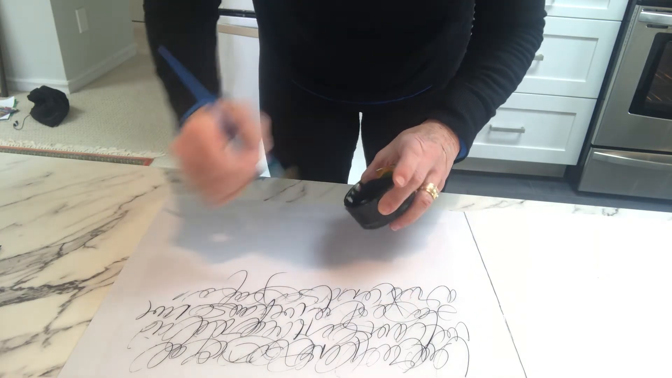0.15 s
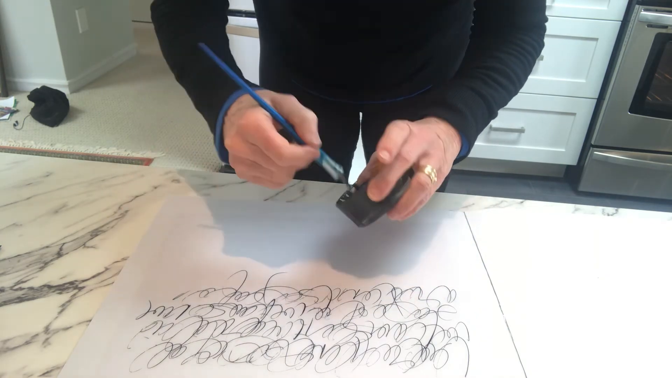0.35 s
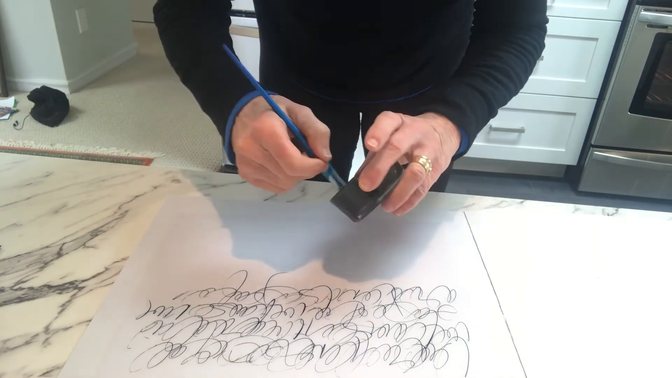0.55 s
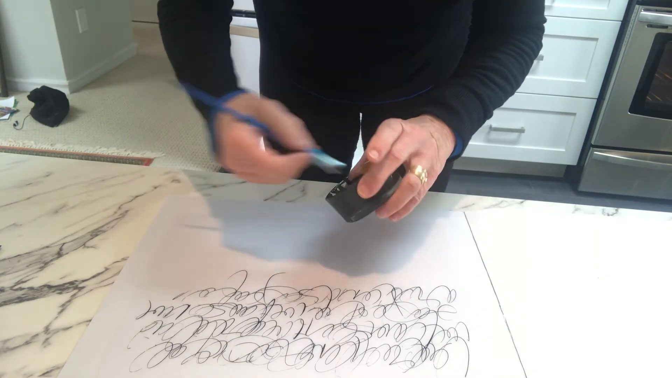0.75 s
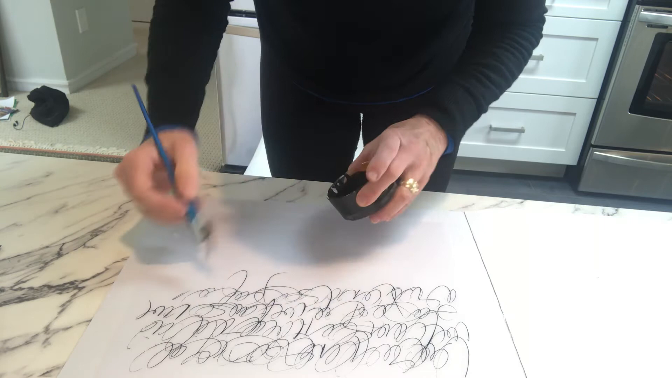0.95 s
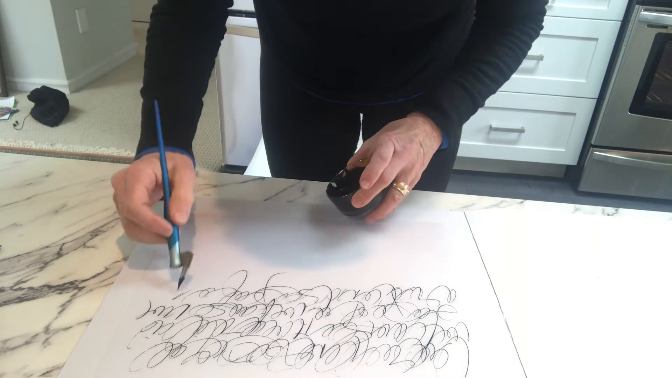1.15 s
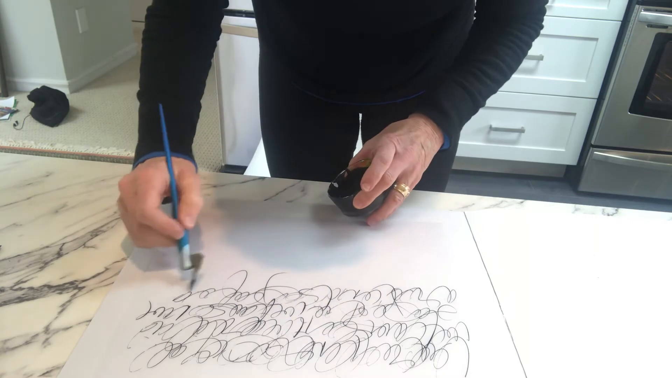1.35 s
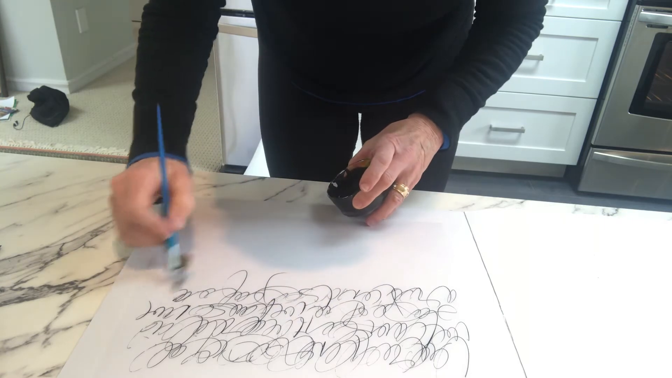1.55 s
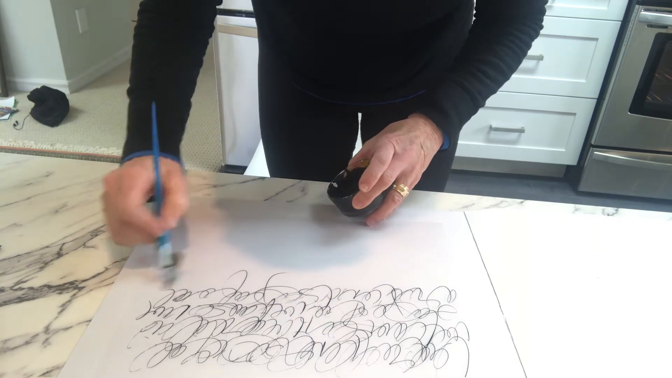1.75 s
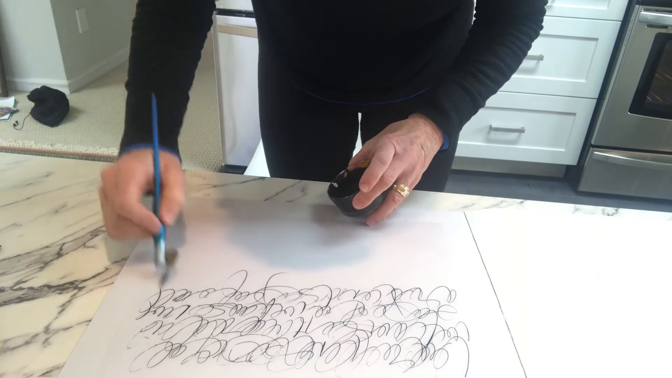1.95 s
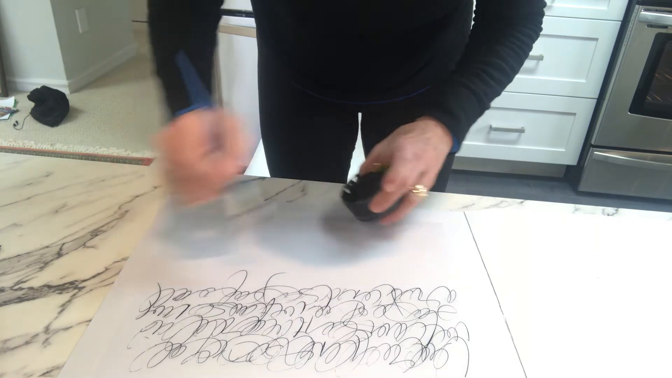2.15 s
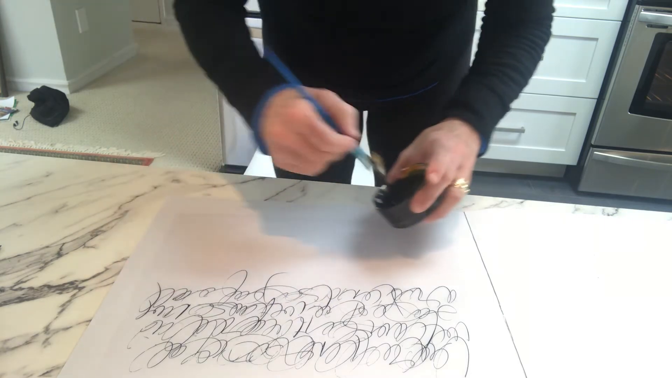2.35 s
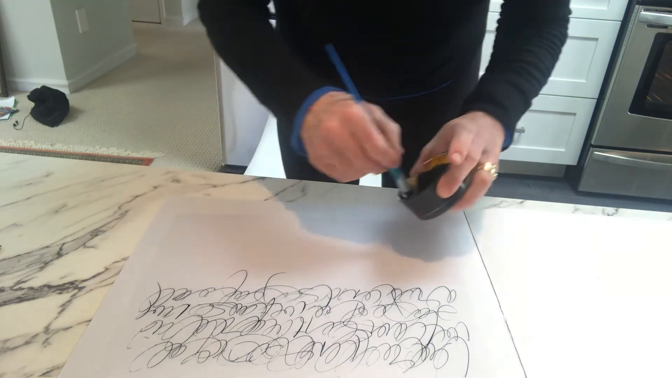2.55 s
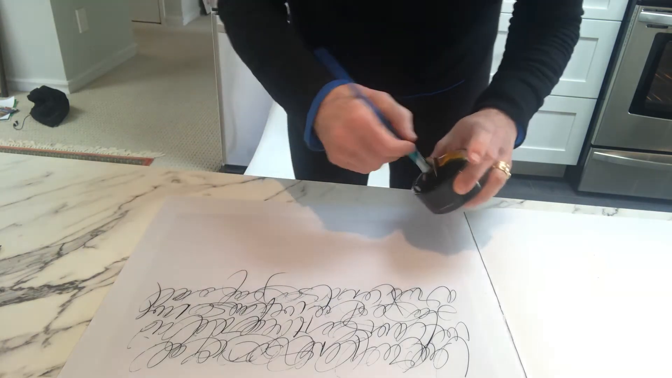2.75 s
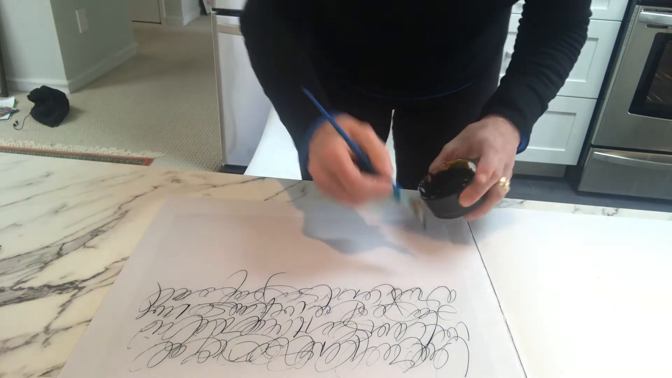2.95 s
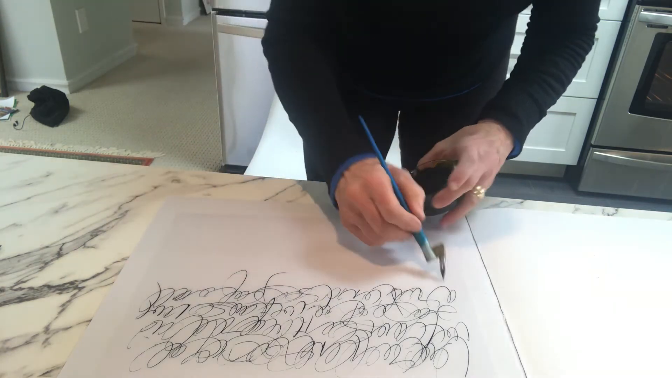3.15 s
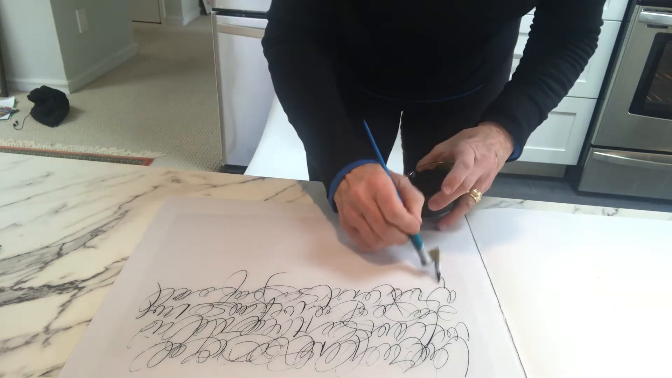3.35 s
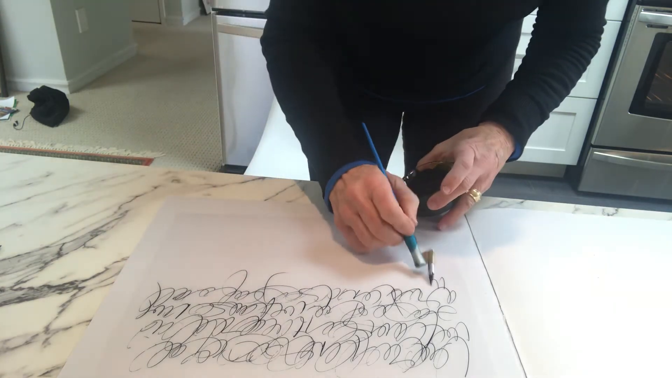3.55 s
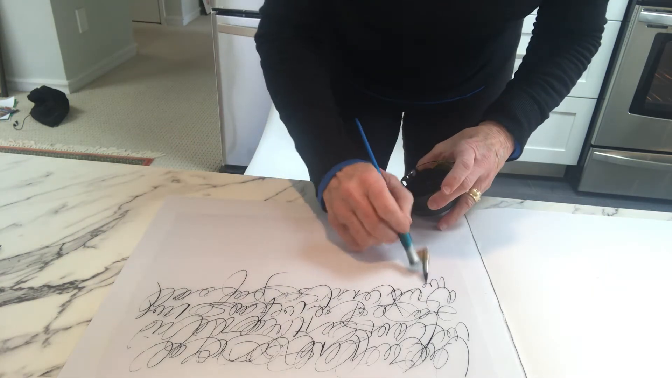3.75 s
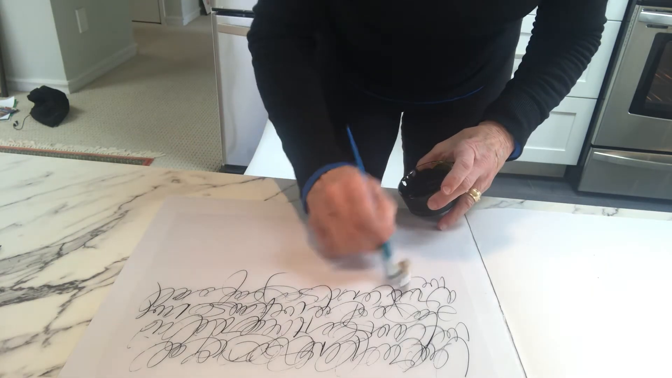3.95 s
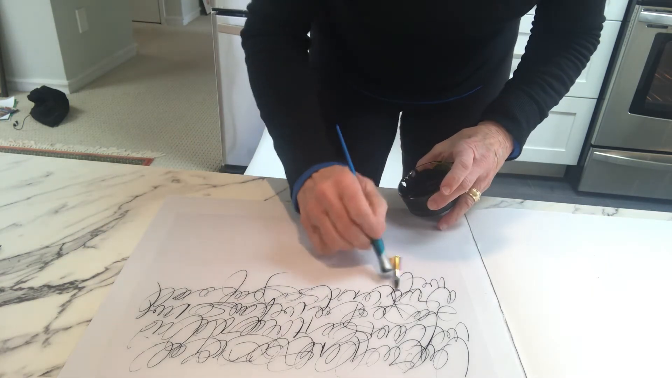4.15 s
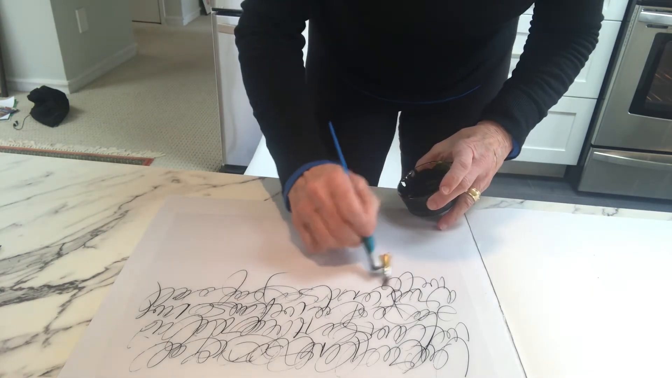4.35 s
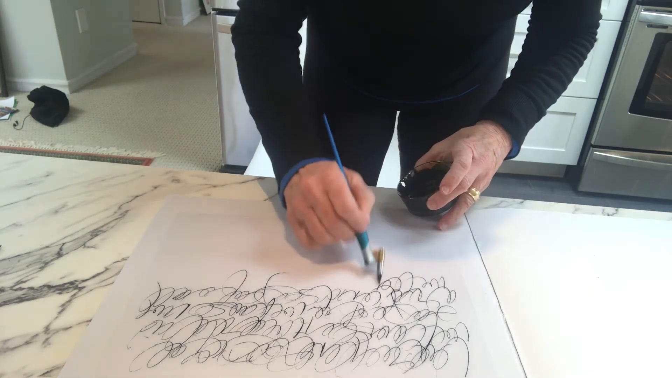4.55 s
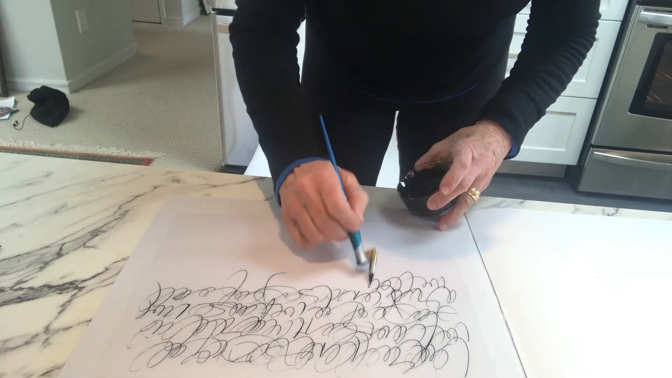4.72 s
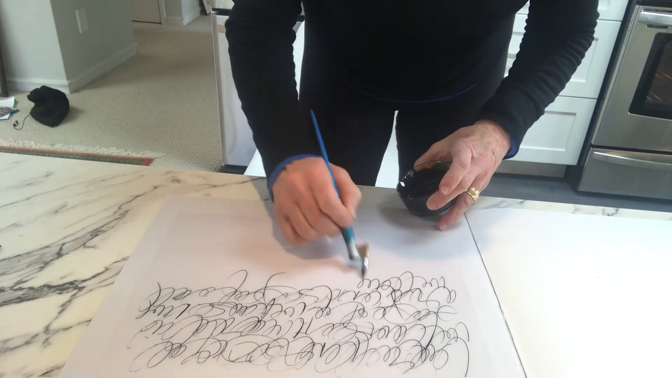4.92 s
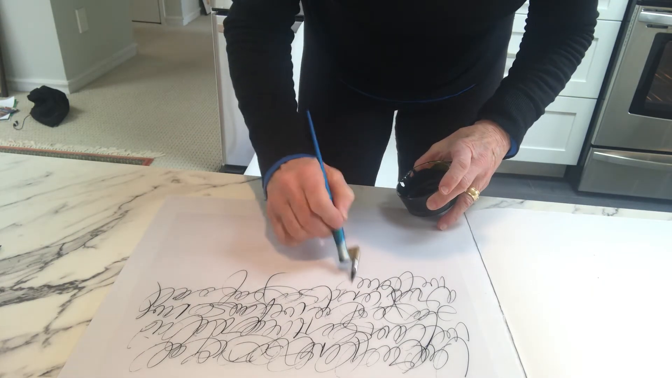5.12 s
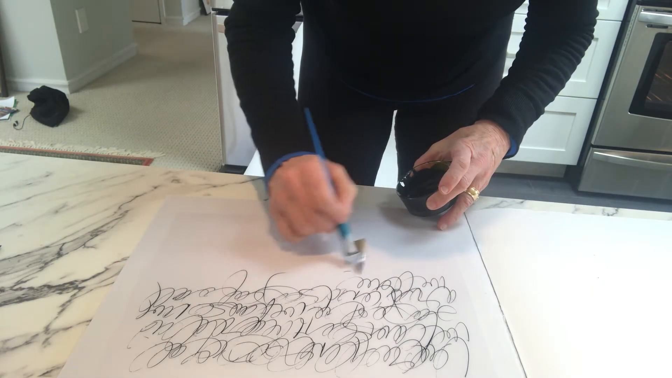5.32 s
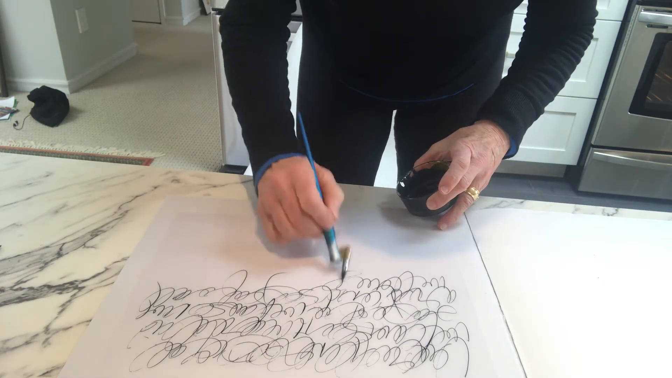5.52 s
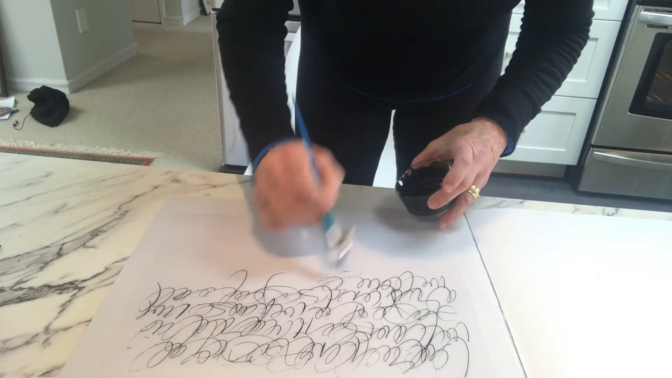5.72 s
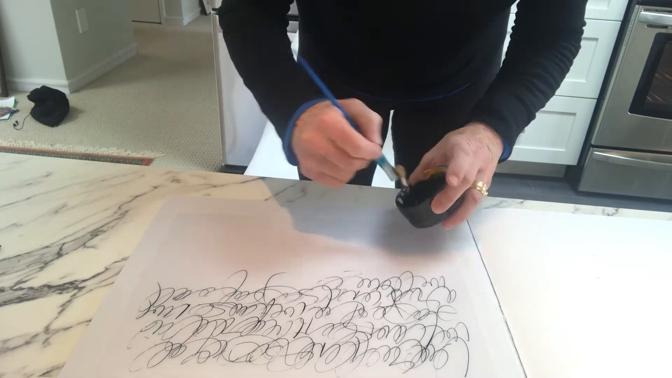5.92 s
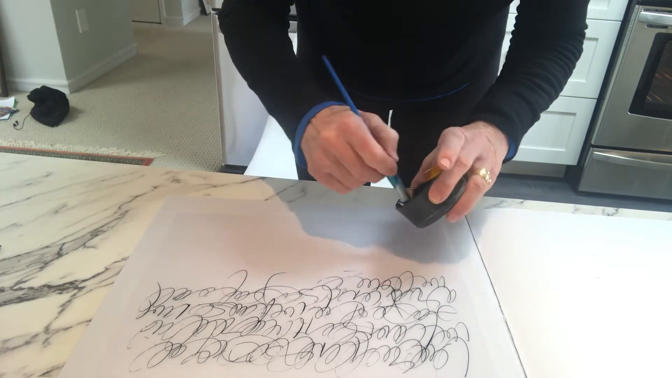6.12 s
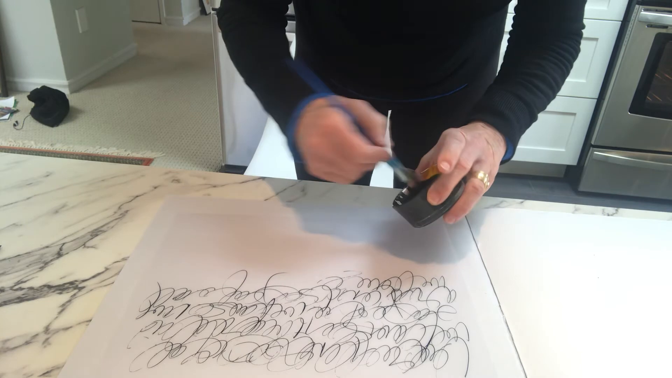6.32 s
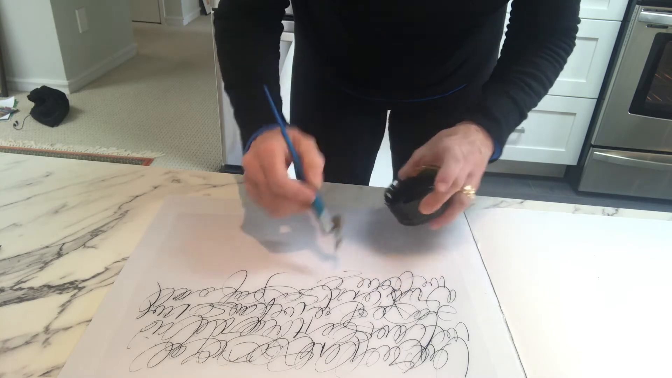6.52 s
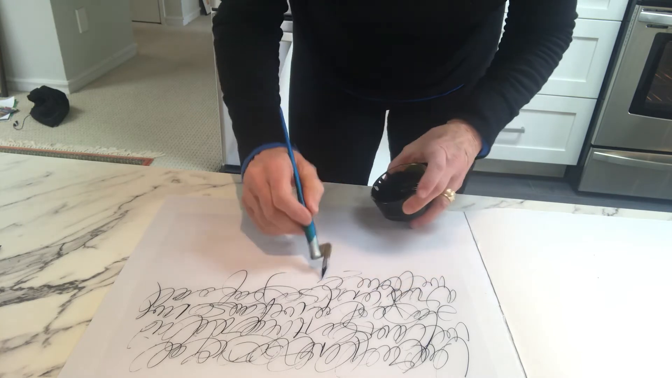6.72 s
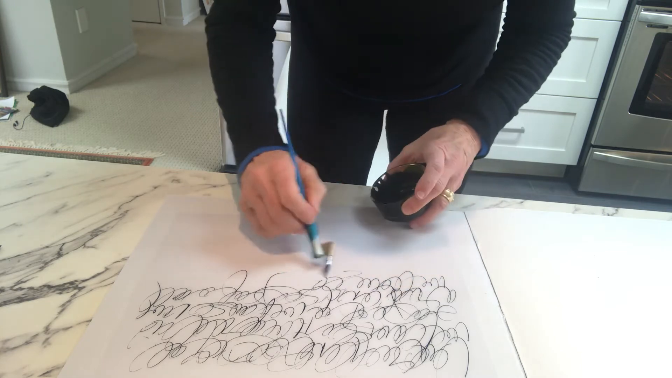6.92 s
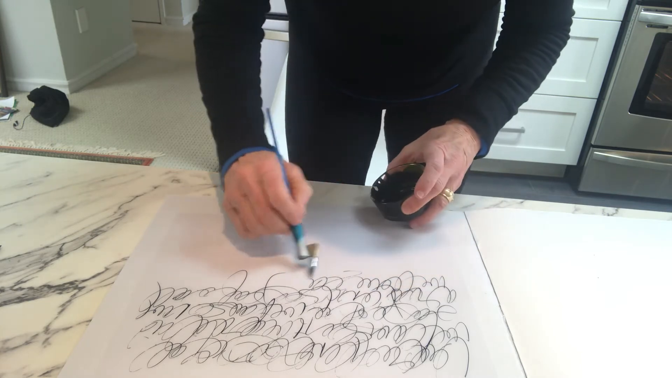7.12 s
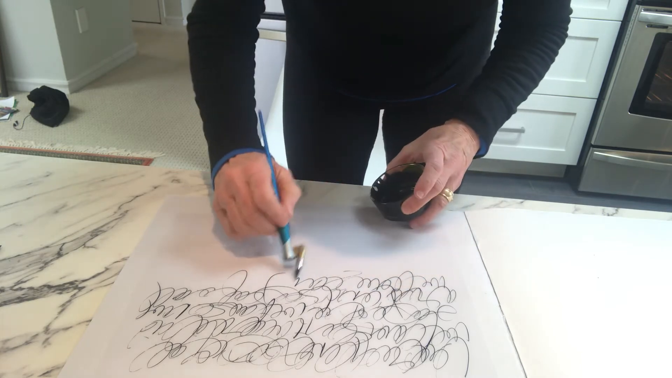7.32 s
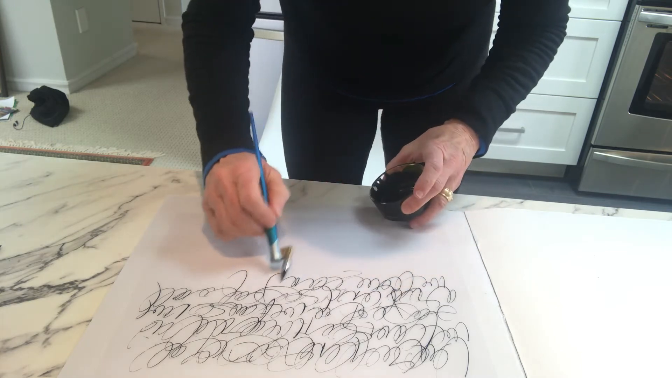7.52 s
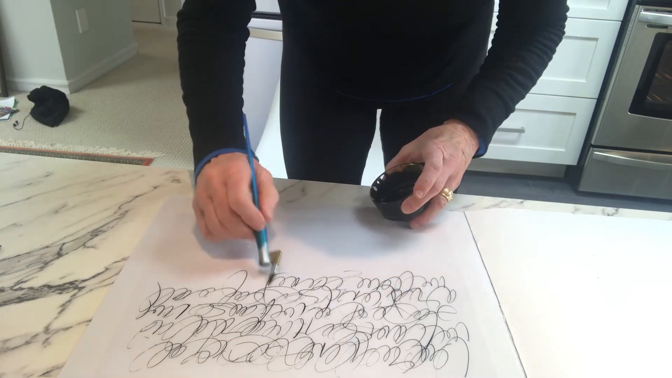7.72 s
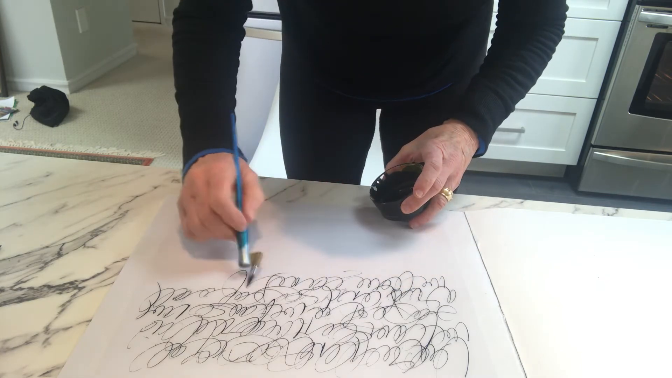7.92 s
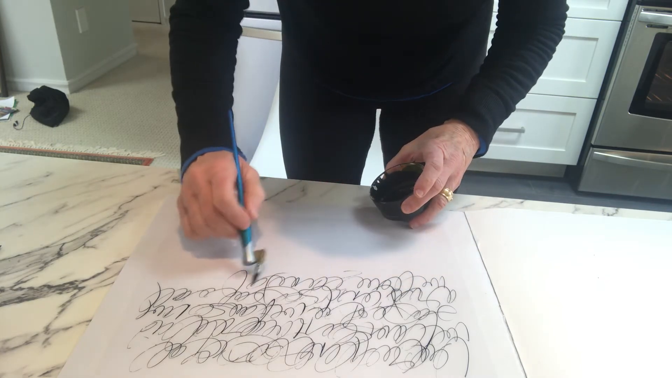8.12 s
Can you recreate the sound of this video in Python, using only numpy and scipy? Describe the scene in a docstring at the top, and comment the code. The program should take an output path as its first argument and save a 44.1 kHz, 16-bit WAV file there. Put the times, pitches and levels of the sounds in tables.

```python
"""A quiet kitchen: a steel dip pen writes three runs of script on a sheet of paper on a stone counter.
The nib snags on paper fibres: noise clicks ring the sheet near 1.3 kHz, and the steel rasps and fizzes above.
Before and between runs the pen clinks in a glass inkwell, as decaying sines and grit; once a sleeve brushes past.
One microphone hears it all close up, with faint reflections, shaped room air and a low hum behind."""
import sys
import numpy as np
from scipy import signal
from scipy.fft import rfft, irfft
from scipy.io import wavfile
from scipy.ndimage import uniform_filter1d, map_coordinates

SR = 44100
rng = np.random.default_rng(int(sys.argv[2]) if len(sys.argv) > 2 else 0)


def wrap_up_sound(samples):
    """Save the sound to the file named by the first command line argument, as 16-bit audio."""
    columns = np.atleast_2d(samples).T
    # keep every value between -1 and 1, then stretch to whole-number steps
    tamed = np.clip(columns, -1, 1)
    steps = np.round(tamed * 32767).astype(np.int16)
    wavfile.write(sys.argv[1], SR, steps)


N = 364707
TIME = np.arange(N) / SR

# Colour of the kitchen air. Each row: frequency in Hz, relative density in dB per Hz.
AIR_COLOUR = [(15, -54), (25, -39), (59, 0.5), (96, -7), (157, -6), (382, -9), (414, -10.5), (500, -12.5),
              (1150, -17), (1590, -20.5), (15800, -38)]
# Hum of an appliance. Each row: frequency in Hz, rms level in dB.
APPLIANCE_HUM = [(69.5, -85.5), (414.5, -79.5)]
# Decay of the kitchen's reflections. Each row: frequency in Hz, time to fall 60 dB in seconds.
ROOM_DECAY = [(1300, 0.47), (5000, 0.35), (15000, 0.28)]

# The sleeve brushing past. Each row: time in seconds, level in dB.
SLEEVE_LEVEL = [(2.1, -85), (2.19, -64.5), (2.275, -57.5), (2.33, -66), (2.44, -81)]
# Colour of the cloth. Each row: frequency in Hz, relative density in dB per Hz.
CLOTH_COLOUR = [(400, -9), (900, -2), (1750, 0), (6500, -5), (11000, -13.5), (16000, -17)]

# The pen knocks against the inkwell. Each row: start in seconds, contact time in seconds, scrape level in dB,
# glass level in dB before the common lift, pen ping in Hz.
INKWELL_KNOCKS = [(0.5065, .004, -60.5, -60, 1400), (2.504, 0.0047, -56, -54, 2720),
                  (2.5345, 0.0072, -50, -29, 2970), (2.625, 0.00081, -48, -44, 1510),
                  (6.1751, 0.0075, -53.5, -52, 2515), (6.202, 0.0032, -44, -33, 4030),
                  (6.212, 0.0042, -48, -41, 4580)]
# The nib is wiped lightly on the rim. Each row: start in seconds, contact time in seconds, scrape level in dB.
RIM_WIPES = [(0.502, .003, -60), (0.572, 0.021, -60), (0.603, 0.0031, -55), (6.107, .003, -59.5),
             (6.241, 0.0073, -60)]
# Modes of the glass. Each row: frequency in Hz, relative level in dB, time to fall 60 dB in seconds.
GLASS_MODES = [(3526, -0.5, 0.064), (3560, -32, 0.14), (3640, -14, 0.029), (4350, -24, 0.04),
               (6050, -7, 0.021), (7520, -22, 0.053)]
# Colour of the pen scraping on the rim. Each row: frequency in Hz, relative density in dB per Hz.
SCRAPE_COLOUR = [(400, -5), (950, 2), (1900, 1.5), (5000, 0), (7000, 7), (9000, 2.5), (11000, 1),
                 (16000, 0.5)]
# Colour of the well's hollow. Each row: frequency in Hz, relative density in dB per Hz.
HOLLOW_COLOUR = [(450, -16), (900, 4), (1500, -1), (2200, -3), (3200, -28)]

# Resonances of the steel nib. Each row: frequency in Hz, width in Hz, lift in dB.
NIB_RESONANCES = [(3090, 230, 5.5), (4450, 67, 9.5), (5500, 200, 3.5), (6110, 350, 7), (6970, 98, 6.5),
                  (10310, 220, 6.5), (12060, 520, 10.5)]
# What lying flat adds to the nib's colour. Each row: frequency in Hz, width in Hz, lift in dB.
FLAT_NIB_CHANGES = [(2150, 700, -5), (3900, 800, 7), (12200, 700, -4)]
# How flat the nib lies on the paper. Each row: time in seconds, share from 0 to 1.
NIB_FLATNESS = [(1.1, 1), (2.0, 1), (3.25, .75), (3.92, .9), (4.3, 0)]
# The nib ticks as it touches down on the paper at the start of a run. Each row: start in seconds,
# level in dB before colouring.
NIB_TICKS = [(1.164, -51), (3.197, -56), (3.231, -50.5), (6.732, -54)]
# The nib's edge whistles briefly. Each row: start in seconds, length in seconds, first pitch in Hz,
# last pitch in Hz, rms level at its height in dB.
EDGE_WHISTLES = [(1.158, 0.036, 5000, 5070, -59.5), (1.518, 0.066, 8250, 6430, -54),
                 (1.728, 0.066, 7500, 4854, -58), (1.843, 0.087, 3917, 4800, -56),
                 (3.829, 0.12, 3950, 3603, -57.5)]
# The nib catches hard and lets go. Each row: start in seconds, peak level in dB.
HARD_CATCHES = [(1.2112, -42), (1.3562, -33), (3.2303, -44), (3.319, -38), (3.3765, -35), (3.5023, -32),
                (3.6452, -32.5), (3.818, -29), (4.0636, -28.5), (4.2428, -39), (4.793, -33.5),
                (5.4466, -35)]

# Pen strokes; the first row is the fading echo of a stroke made before the scene begins. Each row: start in
# seconds, length in seconds, sheet level in dB and brightness (fizz over the sheet) in dB, both before trims.
PEN_STROKES = [(0.0, 0.1, -64.5, -12.0), (1.164, 0.049, -57.5, -5.5), (1.196, 0.13, -47, -8.5),
               (1.311, 0.082, -40, -14.0), (1.399, 0.098, -47.5, -9.5), (1.474, 0.14, -41.5, -8.5),
               (1.604, 0.11, -48.0, -5.5), (1.669, 0.1797, -44.5, -7.0), (1.821, 0.152, -50.5, 0.0),
               (3.184, 0.039, -57.5, -14), (3.222, 0.084, -44.5, -11), (3.308, 0.084, -40.0, -17.5),
               (3.401, 0.11, -51.0, -14.0), (3.48, 0.1, -38, -23.5), (3.606, 0.11, -44.0, -19),
               (3.719, 0.18, -43.5, -19.0), (3.79, 0.15, -53.5, 4.5), (3.931, 0.14, -47.5, -5.0),
               (4.037, 0.12, -42.5, -10.5), (4.154, 0.14, -46, -14.5), (4.233, 0.108, -39, -14.5),
               (4.331, 0.103, -43.5, -17.0), (4.419, 0.1, -43, -16.0), (4.523, 0.1, -48.5, -12.5),
               (4.598, 0.095, -40.5, -18.0), (4.693, 0.12, -48.5, -15.5), (4.762, 0.11, -42.0, -16.5),
               (4.859, 0.16, -49.5, -12.5), (4.96, 0.1, -43.5, -11.0), (5.051, 0.11, -48.0, -10.0),
               (5.137, 0.0744, -48, -7.0), (5.212, 0.09135, -44.0, -12.5), (5.313, 0.14, -38.5, -10.5),
               (5.44, 0.1156, -44.5, -11.0), (5.535, 0.111, -43, -8.5), (6.739, 0.1, -44.5, -17),
               (6.826, 0.12, -46, -12.5), (6.914, 0.13, -44, -16.0), (7.039, 0.097, -50.5, -9),
               (7.108, 0.11, -44.5, -11.5), (7.217, 0.08, -45, -20), (7.303, 0.098, -45.5, -17),
               (7.39, 0.097, -47.5, -15.0), (7.448, 0.12, -42.5, -15.5), (7.566, 0.098, -49.5, -13.0),
               (7.632, 0.125, -42.5, -13.5), (7.743, 0.0896, -51, -12.5), (7.811, 0.14, -42.5, -8),
               (7.94, 0.1, -45, -12.5), (8.027, 0.09, -42.0, -12), (8.122, 0.11, -50.5, -8.5),
               (8.195, 0.1, -43.5, -8)]
# Where the sheet lies loose, a lower ring joins in. Each row: time in seconds, level over the firm ring in dB.
LOOSE_LEVEL = [(1.2, -1), (1.36, -2.5), (1.9, 0), (3.25, 5), (3.35, 4), (3.85, -11), (4.4, -18),
               (6.77, -18), (7.1, -20.5)]
# The ring's climbs and dips, widest in the strokes ending the first run. Each row: time in seconds, pitch ratio.
PITCH_CLIMB = [(1.45, 1), (1.55, 1.07), (1.65, 0.99), (1.72, 1.08), (1.79, 0.96), (1.85, 1.12),
               (1.93, 1.42), (2.1, 1.03)]
# Colour of the firm sheet. Each row: frequency in Hz, relative density in dB per Hz.
SHEET_COLOUR = [(150, -35), (400, -31), (680, -26.5), (1060, -16), (1200, 2.5), (1300, 4), (1430, 0.5),
                (1620, -12.5), (2200, -49.5)]
# Colour of the loose sheet. Each row: frequency in Hz, relative density in dB per Hz.
LOOSE_SHEET_COLOUR = [(280, -23), (620, -21.5), (850, -6), (1000, -5), (1160, 4), (1280, 3.5), (1700, -48)]
# Colour of the steel's rasp. Each row: frequency in Hz, relative density in dB per Hz.
RASP_COLOUR = [(1100, -19), (1500, -0.5), (1750, 0), (2080, 3), (2330, -3), (2650, -9.5), (3300, -11),
               (4900, -16.5), (7000, -49.5)]
# Colour of the tip's fizz. Each row: frequency in Hz, relative density in dB per Hz.
FIZZ_COLOUR = [(3000, -53), (4600, -7), (5400, 0), (7300, 0.5), (9300, -6), (11300, -1.5), (14500, -5),
               (16000, -4)]


def amp(db):
    """Decibels to gain."""
    return 10 ** (np.asarray(db) / 20)


def unit(x):
    """Scales to rms 1."""
    return x / np.sqrt(np.mean(x ** 2) + 1e-20)


def over_time(points):
    """Reads a table of (seconds, value) along the whole scene, holding its end values."""
    return np.interp(TIME, *np.transpose(points))


def over_hz(points, hz):
    """Reads a table of (Hz, value) on a log-frequency axis."""
    f, value = np.transpose(points)
    return np.interp(np.log(hz + 1), np.log(f + 1), value)


def add(mix, start, sound):
    """Mixes a sound in at a time in seconds."""
    part = mix[round(start * SR):][:len(sound)]
    part += sound[:len(part)]


def ring(spectrum, resonances=(), size=4096):
    """Causal (minimum-phase) impulse response, of energy 1, of a body with this spectrum and resonances."""
    hz = abs(np.fft.fftfreq(size, 1 / SR))
    db = over_hz(spectrum, hz)
    for f, width, lift in resonances:
        db = db + lift / (1 + (2 * (hz - f) / width) ** 2)
    minimum_phase = np.exp(np.conj(signal.hilbert(np.log(amp(db)))))
    response = np.fft.ifft(minimum_phase).real[:size // 2]
    return response / np.linalg.norm(response)


def colour(x, spectrum, resonances=()):
    """Plays x through such a body."""
    return signal.oaconvolve(x, ring(spectrum, resonances))[:len(x)]


def wander(hz):
    """Random motion of rms 1, mostly slower than hz."""
    f = np.fft.rfftfreq(N, 1 / SR)
    return unit(irfft(rfft(rng.standard_normal(N)) / (1 + (f / hz) ** 4), N))


def snags(per_s, spread_db):
    """Random friction clicks, rms 1; a positive spread makes a few stand out, a negative one weakens a few."""
    size = amp(spread_db * np.minimum(rng.exponential(1, N), 4))
    happens = rng.random(N) < per_s / SR
    return unit(size * rng.choice([-1, 1], N) * happens)


def background(air_db=-65.5):
    """Steady shaped noise for room air, and a faint appliance hum whose phase wanders."""
    density = amp(over_hz(AIR_COLOUR, np.fft.rfftfreq(N, 1 / SR)))
    air = unit(irfft(rfft(rng.standard_normal(N)) * density, N))
    hum = np.zeros(N)
    for hz, db in APPLIANCE_HUM:
        phase = .5 * wander(hz=5.3)  # radians
        hum += np.sqrt(2) * amp(db) * np.sin(2 * np.pi * hz * TIME + phase)
    return amp(air_db) * air + hum


def kitchen(x, first_s=.006):
    """Dense random reflections from the room, each band dying at its own speed."""
    present = rng.random(SR) < .1
    late = np.arange(SR) / SR > first_s
    taps = rng.standard_normal(SR) * present * late
    hz, t, bands = signal.stft(taps, SR, nperseg=256)
    decay = amp(-60 * t / over_hz(ROOM_DECAY, hz)[:, None])
    tail = signal.istft(bands * decay, SR)[1]
    return signal.fftconvolve(x, tail / np.linalg.norm(tail))[:N]


def sleeve():
    """Soft cloth friction: shaped noise that swells and fades as the arm passes."""
    level = amp(np.interp(TIME, *np.transpose(SLEEVE_LEVEL), left=-140, right=-140))
    return level * colour(rng.standard_normal(N), CLOTH_COLOUR)


def grit(t, contact_s, spectrum, resonances=()):
    """Steel scraping on glass: clicks that swell to half the contact time, then die away."""
    contact = 2 * t / contact_s * np.exp(1 - 2 * t / contact_s)
    clicks = snags(per_s=4600, spread_db=-1.0)[:len(t)]
    return colour(clicks * contact, spectrum, resonances)


def inkwell(glass_db=3, ping_db=12, ping_t60_s=.032, hollow_db=3, knock_s=0.0054, slow_wipe_s=0.021):
    """Each touch scrapes; knocks ring glass and pen, wipes the hollow; longer contact lifts ping and hollow."""
    out, t = np.zeros(N), np.arange(SR // 2) / SR
    glass = sum(amp(db - 60 * t / t60) * np.sin(2 * np.pi * hz * t) for hz, db, t60 in GLASS_MODES)
    for start, contact_s, db, glass_level_db, ping_hz in INKWELL_KNOCKS:
        build = 1 - np.exp(-2 * t / contact_s)  # the ring builds up over the contact
        ping_decay = amp(db + ping_db - 60 * t / ping_t60_s)
        ping = contact_s / knock_s * ping_decay * np.sin(2 * np.pi * ping_hz * t)
        scrape = amp(db) * grit(t, contact_s, SCRAPE_COLOUR, NIB_RESONANCES)
        add(out, start, scrape + build * (amp(glass_level_db + glass_db) * glass + ping))
    for start, contact_s, db in RIM_WIPES:
        scrape = grit(t, contact_s, SCRAPE_COLOUR, NIB_RESONANCES)
        hollow = amp(hollow_db) * contact_s / slow_wipe_s * grit(t, contact_s, HOLLOW_COLOUR)
        add(out, start, amp(db) * (scrape + hollow))
    return out


def nib(x, spectrum):
    """The steel's colour, blended between an upright and a flat nib."""
    flat = np.clip(over_time(NIB_FLATNESS), 0, 1)
    upright_sound = colour(x * (1 - flat), spectrum, NIB_RESONANCES)
    flat_sound = colour(x * flat, spectrum, NIB_RESONANCES + FLAT_NIB_CHANGES)
    return upright_sound + flat_sound


def ticks(decay_s=0.00081):
    """Brief, bright clicks of the bare steel touching down: decaying noise through the nib."""
    out, t = np.zeros(N), np.arange(SR // 20) / SR
    for start, db in NIB_TICKS:
        add(out, start, amp(db) * np.exp(-t / decay_s) * rng.standard_normal(len(t)))
    return nib(out, FIZZ_COLOUR)


def whistles(fuzz_hz=650):
    """A narrow band of friction noise glides as the nib turns: a sine multiplied by slow noise."""
    out = np.zeros(N)
    for start, length, from_hz, to_hz, db in EDGE_WHISTLES:
        n = round(length * SR)
        glide = np.sin(2 * np.pi * np.cumsum(np.linspace(from_hz, to_hz, n)) / SR)
        add(out, start, amp(db) * np.sqrt(2 * np.hanning(n)) * glide)
    return out * wander(hz=fuzz_hz)


def catches(hz=1260, detune_share=0.022, swell_s=0.0031):
    """A hard catch makes the nib chatter for a few cycles near the sheet's resonance."""
    out, t = np.zeros(N), np.arange(SR // 20) / SR
    shape = t / swell_s * np.exp(1 - t / swell_s)
    for start, db in HARD_CATCHES:
        chatter_hz = hz * (1 + detune_share * rng.standard_normal())
        add(out, start, amp(db) * shape * np.sin(2 * np.pi * chatter_hz * t))
    return out


def bend(x, ratio):
    """Moves all resonances of a steady sound by a changing ratio, by reading it faster or slower."""
    return map_coordinates(x, [np.cumsum(ratio) % N], order=3, mode="wrap")


def uneven(x, patchy_db=2.5):
    """As the point of contact shifts, the steel's overtones come and go in random patches."""
    bands = signal.stft(x, SR, nperseg=256)[2]
    patches = uniform_filter1d(rng.standard_normal(bands.shape), size=2, axis=0)  # across frequency
    patches = unit(uniform_filter1d(patches, size=12, axis=1))  # across time
    return signal.istft(bands * amp(patchy_db * patches), SR)[1][:N]


def stroke_gains(rasp_power=0.98, fizz_power=1.33):
    """Each stroke speeds up, glides and slows; the sheet follows the pressure, rasp and fizz the speed."""
    speed_up, slow_down = .27, 0.4774  # shares of the stroke's length
    attack_s = .026  # the sheet answers as the nib bears down
    lift_s = .011  # a stroke overlapping the last one by less starts from a lifted nib
    land_s, jolt_s = 0.0094, 0.0051  # delay until that nib lands, and rise time of the landing
    land_speed = 0.598  # share of full speed at landing
    rasp_base_db, rasp_slope, rasp_top_db = 3.5, .78, 2.5  # over the sheet: at brightness 0, dB per dB, the most
    sheet, rasp, fizz = np.zeros((3, N))  # power
    last_end = 0
    for start, length, db, bright_db in PEN_STROKES:
        t = np.arange(0, length, 1 / SR)
        easing = np.clip((1 - t / length) / slow_down, 0, 1)
        speed = np.clip(t / length / speed_up, 0, 1)
        press = np.clip(t / attack_s, 0, 1)
        if last_end - start < lift_s:
            press = np.clip((t - land_s) / jolt_s, 0, 1)
            speed = press * np.maximum(speed, land_speed)
        rasp_db = min(rasp_base_db + rasp_slope * bright_db, rasp_top_db)
        add(sheet, start, (amp(db) * press * easing) ** 2)
        add(rasp, start, (amp(db + rasp_db) * (speed * easing) ** rasp_power) ** 2)
        add(fizz, start, (amp(db + bright_db) * (speed * easing) ** fizz_power) ** 2)
        last_end = start + length
    return np.sqrt([sheet, rasp, fizz])  # overlapping strokes add in power


def writing(sheet_db=-0.4, fizz_db=1.0, grip_db=1.16, fine_grip_db=1.0, pitch_power=.07):
    """Fibre snags under the moving nib ring the sheet and the steel; the grip varies with the paper's grain."""
    sheet, rasp, fizz = stroke_gains()
    grain = wander(hz=134)
    coarse = unit(snags(per_s=4500, spread_db=2.0) * amp(grip_db * grain))
    fine = unit(snags(per_s=11000, spread_db=2.5) * amp(fine_grip_db * grain))
    loose = amp(over_time(LOOSE_LEVEL))
    firm_ring = colour(coarse, SHEET_COLOUR)
    loose_ring = colour(fine, LOOSE_SHEET_COLOUR)
    paper = (firm_ring + loose * loose_ring) / np.sqrt(1 + loose ** 2)
    # the raspier a stroke is beside its sheet sound, the higher the sheet rings
    raspiness = np.maximum(2 * rasp / (sheet + 1e-9), .65)
    pitch = raspiness ** pitch_power * over_time(PITCH_CLIMB)
    paper = amp(sheet_db) * sheet * bend(paper, pitch)
    steel = nib(unit(coarse + fine) * rasp, RASP_COLOUR)
    tip = amp(fizz_db) * nib(unit(fine + .5 * coarse) * fizz, FIZZ_COLOUR)
    return paper + uneven(steel + tip)


def scene(room_db=-12):
    """Pen, inkwell and sleeve close to one microphone, heard alike in both channels."""
    near = sleeve() + inkwell() + ticks() + whistles() + catches() + writing()
    mono = background() + amp(room_db) * kitchen(near) + near
    return np.array([mono, mono])


def record(dry, edge_hz=15950):
    """The recorder's band limit: a steep low-pass."""
    low_pass = signal.firwin(1023, edge_hz, window=("kaiser", 9), fs=SR)
    return signal.oaconvolve(dry, low_pass[None], "same")


dry = scene()
out = record(dry)
wrap_up_sound(out)
```